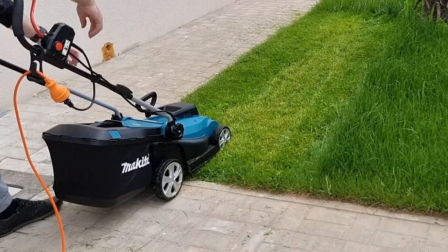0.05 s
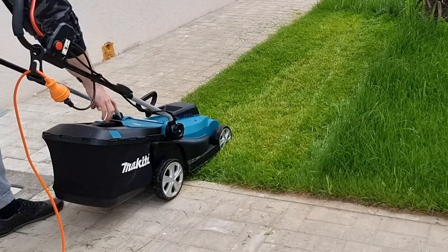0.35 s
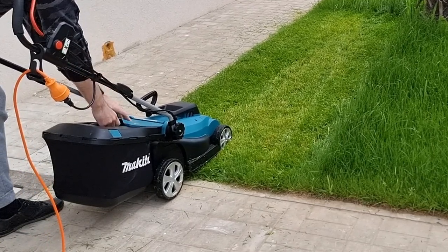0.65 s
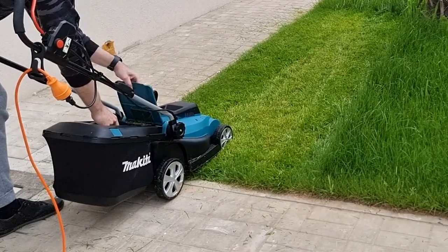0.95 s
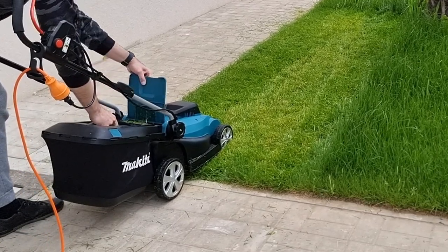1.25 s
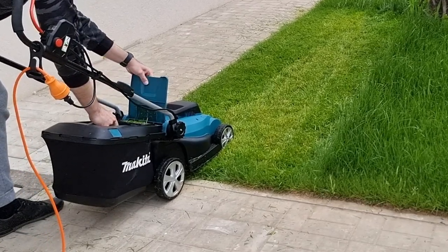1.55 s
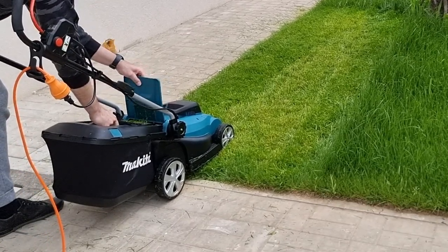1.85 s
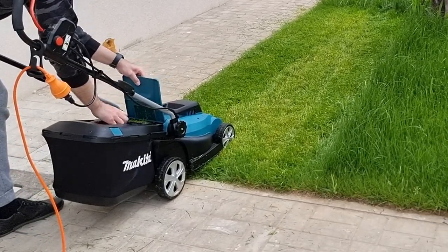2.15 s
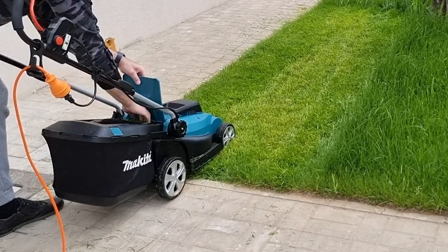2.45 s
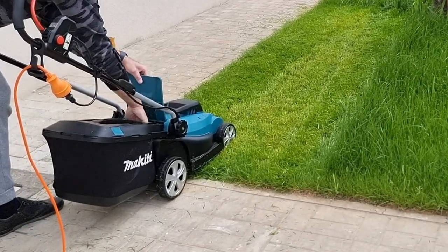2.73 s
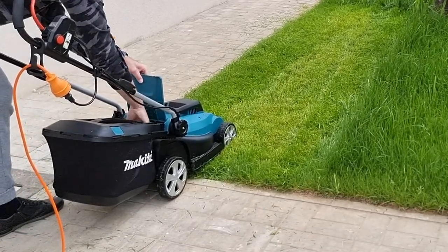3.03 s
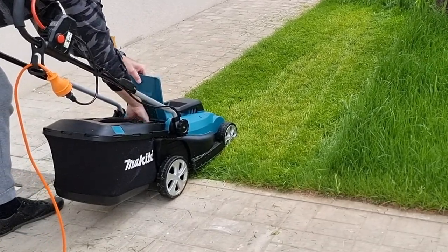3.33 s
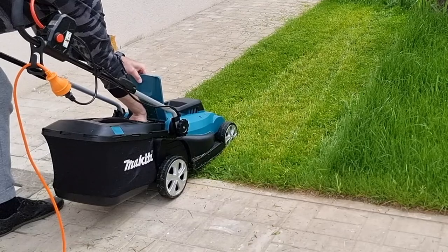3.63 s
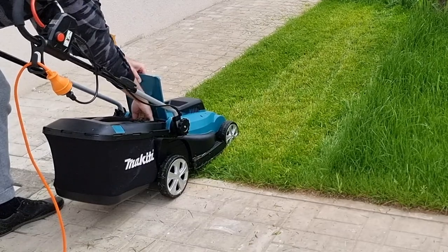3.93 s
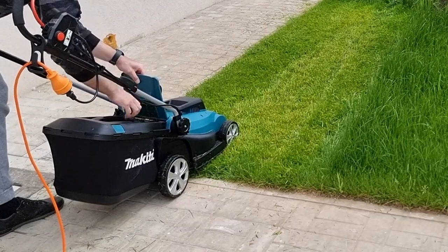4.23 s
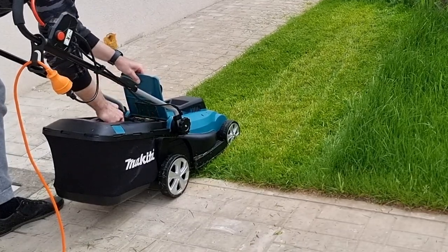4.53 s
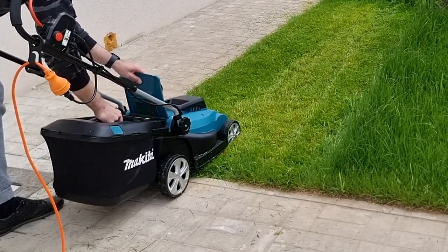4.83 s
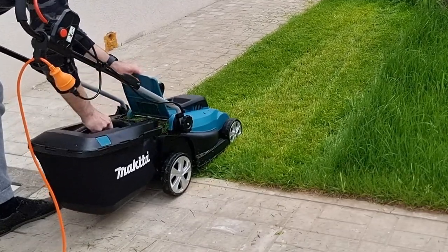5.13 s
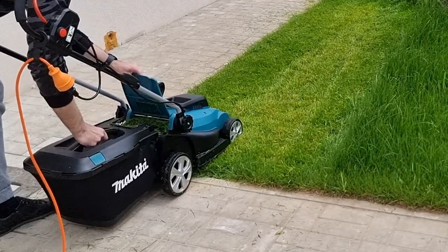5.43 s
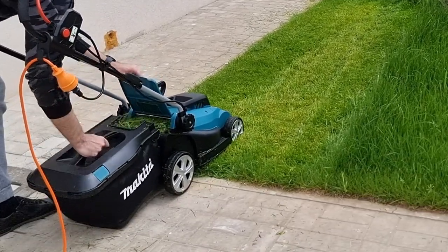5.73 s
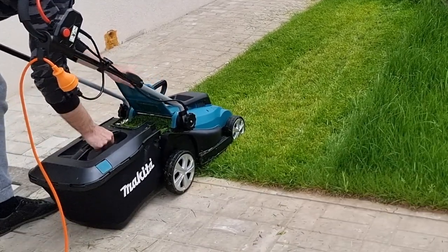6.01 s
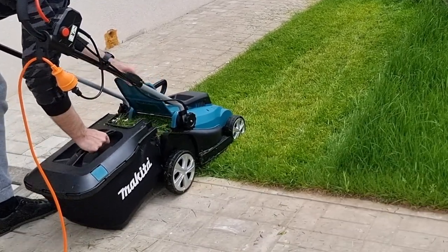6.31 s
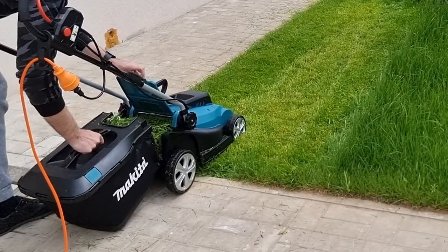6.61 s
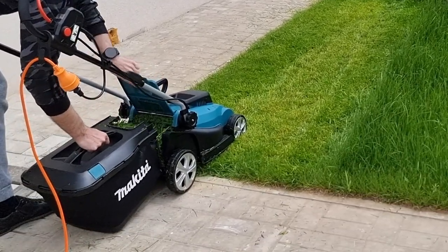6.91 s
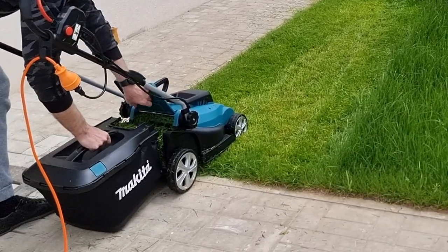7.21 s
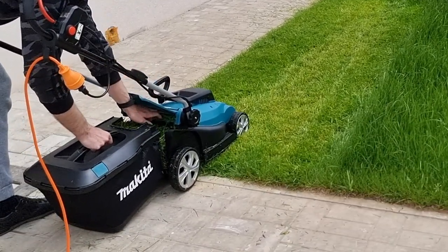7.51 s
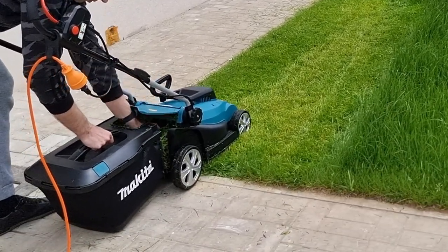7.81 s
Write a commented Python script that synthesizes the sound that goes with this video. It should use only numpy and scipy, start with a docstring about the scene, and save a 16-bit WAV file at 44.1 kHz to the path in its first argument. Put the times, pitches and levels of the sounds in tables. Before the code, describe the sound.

The plastic grass catcher of a switched-off lawn mower is handled close to the microphone in a yard. Light clicks, rustles and finger taps come first. A little past halfway it unhooks with one loud, sharp clack, followed by smaller knocks, scraping and a hollow thud on paving. Near the end the flap shuts with a faint groan, a scrape and crisp clicks. Small birds chirp further off throughout, over a faint town drone.

```python
"""Removing a mower's grass catcher

The plastic catcher of a switched-off lawn mower is unhooked, lifted out and set down on paving.
Impacts excite the modes of the hollow box, which clacks and thuds; stick-slip friction makes it
scrape, a hand rustle in the chute and the flap groan shut. House walls reflect the sound.
Small birds chirp further off, over the low drone of a town."""
import sys
import numpy as np
from scipy import signal
from scipy.fft import rfft, irfft, next_fast_len
from scipy.io import wavfile

SR = 44100
rng = np.random.default_rng(int(sys.argv[2]) if len(sys.argv) > 2 else 0)


def unload_wav(signal):
    """Save mono or channel-first audio to the path in sys.argv[1] as 16-bit WAV at rate SR, clipped to [-1, 1]."""
    wavfile.write(
        sys.argv[1],
        SR,
        np.round(np.clip(np.atleast_2d(signal).T, -1, 1) * 32767).astype(np.int16),
    )


N = 355446
TIME = np.arange(N) / SR

# impacts of the box on mower and paving, the row at 4.858 s being the main knock returned by a house wall:
# (time [s], level [dB], then relative to it: flat landing [dB], hollow body [dB], bright rim [dB], crisp edge
# [dB]; then boom frequency [Hz], boom level [dB])
KNOCKS = [(0.286, -43.5, -1, -1, 12.5, 12, 475, -38.5), (4.8146, -15.5, 4.5, -10.5, -2, -15, 1470, -15.5),
          (4.8349, -40.5, 7.5, 4.5, -2, 10, 690, -34), (4.8583, -43.5, 5, -4, 9, -20, 2720, -28),
          (5.0659, -38.5, 4.5, 1, 0.5, -11, 785, -33), (5.0749, -37.5, 1, -3, -1, -6, 1350, -33),
          (5.094, -42, 3, 3.5, 3, -3, 228, -38), (5.294, -36.5, -4.5, -27, 7, 7, 1610, -34.5),
          (5.664, -57, -9, 14, 14, 17, 316, -40.5), (5.8647, -31, -5, 6.5, -7.5, 8, 500, -37),
          (5.955, -42.5, 0.5, 12.5, -6, 1, 287, -33)]
# likeness of left and right in the yard: (frequency [Hz], correlation [-])
CORRELATION = [(60, 0.88), (190, 0.93), (290, 0.17), (420, -0.24), (700, -0.62), (1300, -0.53),
               (2400, -0.16), (15000, -0.043)]


def from_db(db):
    """Amplitude ratio of a level in decibels."""
    return 10 ** (np.asarray(db) / 20)


def unit_rms(x):
    """Normalisation to unit mean power."""
    return x / np.sqrt(np.mean(x ** 2) + 1e-20)


def at_hz(points, hz):
    """Interpolation of a spectrum on a logarithmic frequency axis."""
    points = np.array(points)
    return np.interp(np.log(hz), np.log(points[:, 0]), points[:, 1])


def decay(t, t60):
    """Exponential damping by 60 dB in t60 seconds."""
    return np.exp(-np.log(1000) * t / t60)


def add(out, onset, sound):
    """Superposition of a sound on the mix, from its onset in seconds."""
    start = max(round(onset * SR), 0)
    out[..., start:start + sound.shape[-1]] += sound[..., :N - start]


def butterworth(x, order, hz, kind):
    """Filtering with a maximally flat passband."""
    return signal.sosfilt(signal.butter(order, hz, kind, fs=SR, output="sos"), x)


def noise(spectrum, size):
    """Random-phase stereo noise of a given spectrum, partly correlated between the sides; rms 1."""
    hz = np.maximum(np.fft.rfftfreq(size, 1 / SR), 1)
    correlation = np.clip(at_hz(CORRELATION, hz), -1, 1)
    mid, side = np.exp(2j * np.pi * rng.random((2, len(hz))))
    stereo = np.sqrt(1 + correlation) * mid + np.sqrt(1 - correlation) * side * [[1], [-1]]
    return unit_rms(irfft(stereo * from_db(at_hz(spectrum, hz)), size))


def narrow_noise(hz, half_width_hz):
    """Noise through one resonance, which at 0 Hz gives a random drift; rms 1."""
    size = next_fast_len(N)
    detuning = (np.fft.rfftfreq(size, 1 / SR) - hz) / half_width_hz
    return unit_rms(irfft(rfft(rng.standard_normal(size)) / (1 + detuning ** 2), size)[:N])


def town():
    """Incoherent far sources sum to a wash of traffic, a swelling rumble and narrow-band drones."""
    # traffic and rumble: (frequency [Hz], relative spectral density [dB])
    traffic_spectrum = [(20, -9), (54, -4), (168, -8), (215, -9), (330, -11.5), (780, -13.5), (1100, -19.5),
                        (1900, -27), (2600, -28.5), (3900, -27), (4800, -41), (6900, -36), (8400, -58.5),
                        (11000, -53.5), (15500, -52.5)]
    rumble_spectrum = [(20, -14), (33, -5.5), (52, 14), (75, 4.5), (110, -9.5), (200, -37), (600, -94)]
    # swell of the rumble: (time [s], level [dB])
    swell = [(0, -61.5), (1.2, -54), (1.7, -57.5), (2.3, -51.5), (3.9, -59), (4.3, -63.5), (5.2, -61),
             (6.3, -56), (8.06, -61)]
    # far machinery: (frequency [Hz], bandwidth [Hz], level [dB])
    machines = [(52.7, 11, -65.5), (137.7, 3.1, -65), (223.7, 9.5, -65.5)]
    rumble = from_db(np.interp(TIME, *np.transpose(swell))) * noise(rumble_spectrum, N)
    drones = sum(from_db(db) * narrow_noise(hz, width / 2) for hz, width, db in machines)
    return from_db(-56) * noise(traffic_spectrum, N) + rumble + drones


def whine(waver_hz):
    """A faint tone sinks and fades; random amplitude modulation spreads it into a narrow band."""
    # falling tone: (time [s], frequency [Hz], level [dB])
    glide = [(0, 750, -63), (0.199, 677, -68), (0.451, 595, -74), (.8, 532, -88)]
    times, hz, db = np.transpose(glide)
    phase = 2 * np.pi * np.cumsum(np.interp(TIME, times, hz)) / SR
    waver = np.array([narrow_noise(0, waver_hz) for side in range(2)])
    return from_db(np.interp(TIME, times, db)) * np.sin(phase) * waver


def chorus(flicker_db, bands=6):
    """Many far birds superpose into a noisy twitter whose bands fluctuate independently."""
    # swell of the twitter: (time [s], level [dB])
    swell = [(0, -65.5), (1.0, -74), (2.1, -76), (2.95, -61), (4.0, -72.5), (4.5, -65.5), (5.6, -72),
             (8.06, -68)]
    # its colour: (frequency [Hz], relative spectral density [dB])
    colour = [(1800, -18), (2800, -5), (3900, 2.5), (4700, -4.5), (5400, -8), (6800, -13), (8200, -30),
              (11000, -37)]
    spectrum = rfft(noise(colour, N))
    band = np.digitize(np.fft.rfftfreq(N, 1 / SR), np.geomspace(3100, 5000, bands - 1))
    twitter = sum(irfft(spectrum * (band == k), N) * from_db(flicker_db * narrow_noise(0, 12))
                  for k in range(bands))
    return from_db(np.interp(TIME, *np.transpose(swell))) * twitter


def bird_notes():
    """Birds repeat stereotyped calls, each time transposed by a common frequency ratio."""
    # notes of a call: (delay [s], duration [s], start pitch [Hz], middle pitch [Hz], end pitch [Hz],
    # relative level [dB], rasp [share of pitch])
    rising_call = [(0, 0.0426, 4810, 5204, 5290, 1.5, 0.046), (.085, .045, 3493, 4230, 4300, -2, 0.064)]
    swoop_call = [(0, .03, 5450, 5520, 5300, -5, 0.012), (.014, .05, 5200, 4870, 4000, 0, 0.016),
                  (.095, 0.045, 3620, 3680, 3660, -7, 0.02), (.108, .028, 3950, 4100, 4080, -7, .03)]
    chirrup_call = [(0, 0.03, 3900, 4160, 4370, 0, 0.027), (.022, .1, 3750, 3150, 2850, -8.5, 0.065)]
    slur_call = [(0, 0.06, 3950, 4260, 4030, -4.5, 0.055), (.045, 0.095, 3300, 2950, 2750, -2.5, 0.06)]
    pip_call = [(0, 0.024, 3900, 4020, 3850, 0, 0.05)]
    # when each is sung: (time [s], level [dB], pitch ratio [-])
    risings = [(0.022, -62, 1.05), (0.318, -61.5, 1.04), (0.754, -62, 1.01), (1.603, -63.5, 0.99),
               (2.094, -62, 0.99), (3.359, -61, 1.03), (3.707, -63, .98), (4.149, -61.5, 1.04),
               (6.415, -62, 1), (7.815, -63, 1.01)]
    swoops = [(1.274, -46.5, 1), (2.943, -48.5, 1.01), (5.116, -53.5, 1.01)]
    chirrups = [(0.874, -49.5, 0.97), (2.37, -51.5, 1)]
    slurs = [(0.567, -71.5, 1), (1.035, -61.5, 0.97), (1.48, -59, 1.15), (2.834, -60, 0.96),
             (4.389, -60, 0.96), (5.402, -62, 1.03), (6.312, -57.5, 1.01), (6.813, -59, 0.98),
             (7.645, -59.5, 1.03)]
    pips = [(0.488, -60, 0.99), (0.599, -60, 1), (0.683, -67, 0.97), (1.626, -58, 0.99),
            (1.702, -55.5, 0.99), (1.790, -58.5, 1), (1.868, -56, 1), (4.11, -66, 0.95), (4.508, -63.5, 1),
            (4.648, -62, .98), (4.72, -61, 0.97), (6.147, -60, 0.95)]
    for call, repeats in ((rising_call, risings), (swoop_call, swoops), (chirrup_call, chirrups),
                          (slur_call, slurs), (pip_call, pips)):
        for onset, db, ratio in repeats:
            for delay, length, *pitches, note_db, rasp in call:
                yield onset + delay, length, ratio * np.array(pitches), db + note_db, rasp


def birds(waver_hz, flutter_db, overtone_db):
    """Each note is a whistle gliding through three pitches, made raspy by fast frequency modulation."""
    song, waver = np.zeros(N), narrow_noise(0, waver_hz)
    for onset, length, pitches, db, rasp in bird_notes():
        progress = np.linspace(0, 1, round(length * SR))
        glide = np.polyval(np.polyfit([0, .5, 1], pitches, 2), progress)
        pitch = glide * (1 + rasp * np.interp(onset + length * progress, TIME, waver))
        phase = 2 * np.pi * np.cumsum(pitch) / SR
        whistle = np.sin(phase) + from_db(overtone_db) * np.sin(2 * phase)
        add(song, onset, from_db(db) * whistle * np.sqrt(np.abs(np.sin(np.pi * progress))))
    song *= from_db(flutter_db * narrow_noise(0, 51))
    return np.array([song, np.interp(TIME - .00048, TIME, song)])   # reaches the left side first


def yard_reverb(x, t60, wet_db, dull_hz):
    """Diffuse scattering from paving, walls and fences leaves a decaying tail with weakened treble."""
    t = TIME[:SR]
    tail = noise([(20, 0), (dull_hz, 0), (4 * dull_hz, -12)], SR) * decay(t, t60)
    tail *= 1 - decay(t, 0.0055)
    tail /= np.sqrt(np.sum(tail ** 2) / 2)   # unit mean energy per side
    return from_db(wet_db) * signal.fftconvolve(x, tail, axes=1)[:, :N]


def wall_echoes(x, low_hz, high_hz):
    """Specular reflection: each house wall returns one band-limited copy, slightly later on the right."""
    # reflections: (delay [s], level [dB])
    walls = [(0.021, -10), (0.044, -12)]
    out, reflected = np.zeros((2, N)), butterworth(x, 1, [low_hz, high_hz], "band")
    for delay, db in walls:
        add(out[0], delay, from_db(db) * reflected[0])
        add(out[1], delay + 0.0001, from_db(db) * reflected[1])
    return out


def flap_squeak():
    """Periodic stick-slip in the lowered flap gives an arching pitch; only a few high harmonics carry."""
    # the squeak: (time [s], duration [s], peak fundamental [Hz], sag at the ends [share of pitch])
    stroke = (7.076, .082, 570, .09)
    # its partials: (harmonic number [-], level [dB])
    harmonics = [(5, -57), (6, -54), (7, -85), (9, -77)]
    onset, length, peak_hz, sag = stroke
    from_middle = np.clip(2 * (TIME - onset) / length - 1, -1, 1)
    phase = 2 * np.pi * np.cumsum(peak_hz * (1 - sag * from_middle ** 2)) / SR
    tone = (1 - from_middle ** 2) * sum(from_db(db) * np.sin(k * phase) for k, db in harmonics)
    return np.array([tone, np.interp(TIME - .0005, TIME, tone)])   # reaches the left side first


def flap_groans(slips_per_s, t60):
    """Irregular stick-slip: each slip of the swinging flap excites a resonance of the hollow plastic."""
    # drags as it opens and shuts: (time [s], duration [s], resonance [Hz], level [dB])
    drags = [(0.96, 0.17, 550, -64), (1.027, 0.068, 337, -61.5), (7.227, 0.053, 205, -55.5),
             (7.28, 0.099, 312, -59), (7.346, 0.09, 265, -55.5), (7.471, 0.075, 257, -60),
             (7.612, 0.044, 304, -56)]
    out = np.zeros(N)
    for onset, length, hz, db in drags:
        t = TIME[:round(length * SR)]
        slips = (rng.random(SR)[:len(t)] < slips_per_s / SR) | (t == 0)
        resonance = np.sin(2 * np.pi * hz * t) * decay(t, t60)
        ringing = signal.fftconvolve(slips.astype(float), resonance)[:len(t)]
        envelope = np.sqrt(np.abs(np.sin(np.pi * t / length)))
        add(out, onset, from_db(db) * unit_rms((ringing - ringing.mean()) * envelope))
    return out


def grit(grains_per_s, spread_db, low_hz):
    """Shot noise: dry clippings and sand crunch under the sliding plastic in tiny random clicks."""
    # gritty scrapes: (time [s], duration [s], level [dB])
    scrapes = [(0.17, 0.059, -68), (0.273, 0.054, -62.5), (5.827, 0.27, -72), (7.342, 0.12, -73)]
    out = np.zeros((2, N))
    for onset, length, db in scrapes:
        size = round(length * SR)
        hits = rng.random((2, size)) < grains_per_s / SR
        clicks = hits * rng.standard_normal((2, size)) * from_db(spread_db * rng.standard_normal(size))
        crunch = unit_rms(butterworth(clicks, 2, low_hz, "high"))
        add(out, onset, from_db(db) * crunch * np.sin(np.pi * np.linspace(0, 1, size)))
    return out


def rubs(grain_db, judder_db, skid_s):
    """Sliding friction sticks and slips, radiating a grainy hiss and driving a shudder in the box."""
    # sleeve, clippings and plastic sliding: (time [s], duration [s], hiss [dB], shudder [dB])
    slides = [(0.0, 0.6, -72, -64.5), (0.15, 0.1, -64.5, -68), (0.296, 0.052, -67, -57),
              (0.595, 0.25, -70, -61.5), (0.921, 0.46, -96, -60.5), (2.572, 0.61, -71.5, -62),
              (4.792, 0.071, -62, -45.5), (4.927, 0.64, -62, -54), (5.692, 0.75, -63, -60),
              (5.89, 0.065, -61, -54), (6.617, 0.37, -65.5, -63.5), (7.206, 0.29, -73, -58),
              (7.344, 0.1, -51.5, -63), (7.444, 0.38, -58, -58.5)]
    # friction noise: (frequency [Hz], relative spectral density [dB])
    hiss_spectrum = [(800, 7.5), (2000, -13.5), (4000, 8), (6200, 5), (8000, -6.5), (10000, -11.5),
                     (15000, -18)]
    shudder_spectrum = [(110, -39), (200, 2), (300, -4.5), (500, -3), (800, -8), (1300, -11), (2500, -18),
                        (6000, -46)]
    # the heavier a knock thuds, the louder the box skids after it
    skids = [(onset, skid_s, db + hollow_db - 33.5, db + hollow_db - 20)
             for onset, db, _, hollow_db, *_ in KNOCKS]
    hiss, shudder = np.zeros((2, N))
    for onset, length, hiss_db, shudder_db in slides + skids:
        stroke = np.sin(np.pi * np.clip((TIME - onset) / length, 0, 1) ** 0.36)   # peaks early
        hiss += from_db(hiss_db) * stroke
        shudder += from_db(shudder_db) * stroke
    grains = unit_rms(from_db(grain_db * narrow_noise(0, 350)))
    judder = unit_rms(from_db(judder_db * narrow_noise(0, 42)))
    return judder * (hiss * grains * noise(hiss_spectrum, N) + shudder * noise(shudder_spectrum, N))


def ticks(t60, size=2048):
    """Sudden release of small stiff catches radiates bright, heavily damped transients."""
    # hooks and flap edge letting go: (time [s], level [dB])
    releases = [(0.025, -52), (0.18, -45.5), (0.283, -57), (2.554, -47), (4.150, -47.5), (5.181, -48),
                (5.865, -60), (5.989, -47.5), (6.172, -59), (7.349, -45), (7.355, -42), (7.379, -43),
                (7.638, -38.5)]
    # quick steps in which a catch slips: (delay [s], relative level [dB])
    steps = [(0, -1), (.0035, -10), (.0074, -10)]
    # colour of a tick: (frequency [Hz], relative spectral density [dB])
    spectrum = [(1000, -11), (3500, -12), (5500, 0), (7000, 4.5), (9000, -14.5), (15000, -15)]
    out = np.zeros((2, N))
    for onset, db in releases:
        for delay, step_db in steps:
            add(out, onset + delay, from_db(db + step_db) * noise(spectrum, size) * decay(TIME[:size], t60))
    return out


def booms(attack_cycles, decay_cycles):
    """Flexural vibration: the struck wall booms at a pitch set by the spot and the grip."""
    out, t = np.zeros((2, N)), TIME[:SR // 2]
    for onset, *_, hz, db in KNOCKS:
        phase_gap = np.arccos(np.clip(at_hz(CORRELATION, hz), -1, 1))   # the left side leads
        tone = np.sin(2 * np.pi * hz * t + phase_gap * np.array([[.5], [-.5]]))
        envelope = decay(t, decay_cycles / hz) * (1 - decay(t, attack_cycles / hz))
        add(out, onset, from_db(db) * tone * envelope)
    return out


def contacts(landing_s=.0037):
    """A knock is a multiple impact of edge, flat wall and rebound; a finger tap is a single one."""
    # normal modes: (frequency [Hz], level [dB], t60 [s], left-right correlation before clipping [-])
    box_modes = [(145, -26, 0.35, 0.47), (191.6, -27.5, 0.36, 1), (226, -21.5, 0.15, 0.75),
                 (322, -14, 0.044, 0.25), (393, -15.5, 0.11, -0.46), (481, -14, 0.053, -0.15),
                 (510, -20.5, 0.18, -0.92), (626, -18, 0.05, -1.13), (785, -22.5, 0.074, -0.91),
                 (810, -16.5, 0.094, -0.81), (1060, -20.5, 0.04, -1.1), (1286, -19, 0.044, -0.58),
                 (1617, -15, 0.025, -0.12), (1730, -16, 0.032, 1), (1855, -16, 0.025, 0.58),
                 (1930, -25.5, 0.17, -0.83), (2036, -18, 0.17, 0.04), (2093, -24.5, 0.1, -0.95),
                 (2240, -13, 0.031, -0.7), (2634, -18, 0.029, -1), (3140, -16, 0.064, -1.94),
                 (3356, -22, 0.036, 0.2), (4300, -12.5, 0.0021, 1), (6700, -22, 0.02, 0)]
    flap_modes = [(146.5, -7, 0.12, 0.59), (190, -16, 0.13, 0.8), (345, -11, 0.061, 0.14),
                  (690, 0.5, 0.082, -0.96), (780, -8.5, 0.045, -0.28), (1130, -6, 0.027, -0.42),
                  (1470, -2, 0.024, -0.003), (1860, -1, 0.028, -0.46), (3940, -13.5, 0.023, 0.26),
                  (5650, -8, 0.011, 0.78)]
    # impacts of the lowered flap: (time [s], level [dB], then relative to it: flat landing [dB],
    # hollow body [dB], bright rim [dB], crisp edge [dB])
    flap_knocks = [(7.266, -39, -4.5, 6.5, -2.5, 11), (7.542, -55, 9, 8, 26.5, -2)]
    # the loose plastic bouncing once: (delay [s], relative level [dB])
    rebound = (0.011, -12)
    # fingers on the wall: (time [s], level [dB])
    taps = [(2.288, -46.5), (3.247, -46.5), (3.761, -46), (6.807, -45)]
    # tint of a tap, and of a flat landing against the first touch: (frequency [Hz], gain [dB])
    tap_colour = [(380, 2), (1700, -2.5), (4500, -2), (10000, -8)]
    landing_tint = [(380, 6.5), (1700, -0.5), (4500, -0.5), (10000, -8)]
    rebound_s, rebound_db = rebound
    for modes, blows in ((box_modes, KNOCKS), (flap_modes, flap_knocks)):
        for onset, db, landing_db, hollow_db, bright_db, crisp_db, *_ in blows:
            colour = [(380, hollow_db), (1700, 0), (4500, bright_db), (10000, crisp_db)]
            landing_colour = [(hz, gain_db + at_hz(landing_tint, hz)) for hz, gain_db in colour]
            yield modes, onset, db, colour
            yield modes, onset + landing_s, db + landing_db, landing_colour
            yield modes, onset + rebound_s, db + rebound_db, colour
    for onset, db in taps:
        yield box_modes, onset, db, tap_colour


def impact(modes, colour, snap_hz, spread_db, size=8192):
    """Impulse response: a snap and a short crack, while the modes ring as strongly as the spot allows."""
    # crowded, quickly damped modes of the thin walls: (frequency [Hz], relative spectral density [dB])
    crack_spectrum = [(150, -60), (450, 10), (850, 14), (1150, -9), (1700, -0.5), (3300, 2.5), (4800, -7.5),
                      (6500, -5.5), (9000, -21), (15000, -51)]
    t = TIME[:size]
    hz, db, t60, correlation = np.transpose(modes)[:, :, None]
    index = np.arange(len(modes))[:, None]
    strength = from_db(db + at_hz(colour, hz) + spread_db * rng.standard_normal(hz.shape))
    # each wall radiates its own way, so a mode reaches one side first
    lag = np.arccos(np.clip(correlation, -1, 1)) / (2 * np.pi * hz) * (-1) ** (index // 2)
    age = np.maximum(t - np.maximum([lag, -lag], 0), 0)
    ringing = np.sum((-1) ** index * strength * np.sin(2 * np.pi * hz * age) * decay(age, t60), axis=1)
    snap = from_db(22) * butterworth(t == 0, 2, [snap_hz / np.sqrt(2), snap_hz * np.sqrt(2)], "band")
    crack = from_db(-5.5) * noise(crack_spectrum, size) * (1 - decay(t, 0.0033))
    tint = from_db(at_hz(colour, np.maximum(np.fft.rfftfreq(size, 1 / SR), 1)))
    return ringing + irfft(rfft(snap + crack) * tint) * decay(t, t60=0.043)


def knocks(hard_snap_hz, thud_db_per_octave, lowest_hz):
    """Impacts clack and thud: softer contacts snap lower, and the box is too small to radiate deep bass."""
    out = np.zeros((2, N))
    for modes, onset, db, colour in contacts():
        (_, hollow_db), (_, middle_db), *_ = colour
        snap_hz = hard_snap_hz / 2 ** (max(hollow_db - middle_db, 0) / thud_db_per_octave)
        add(out, onset, from_db(db) * impact(modes, colour, snap_hz, spread_db=2.0))
    return butterworth(out, 2, lowest_hz, "high")


def scene():
    """Direct and reflected sound superpose: the box close by, the birds more reverberant, the town behind."""
    box = knocks(hard_snap_hz=1750, thud_db_per_octave=5.5, lowest_hz=168) + ticks(t60=0.01)
    box += booms(attack_cycles=1.8, decay_cycles=40)
    box += flap_groans(slips_per_s=130, t60=0.06)
    box += grit(grains_per_s=3500, spread_db=2.0, low_hz=7900)
    box += rubs(grain_db=1.5, judder_db=3.0, skid_s=0.1)
    echoes = wall_echoes(box, low_hz=2230, high_hz=4900)
    box += echoes + yard_reverb(box, t60=0.35, wet_db=-15.0, dull_hz=4330)
    song = birds(waver_hz=450, flutter_db=2.5, overtone_db=-39)
    song = from_db(0.5) * song + yard_reverb(song, t60=0.46, wet_db=-3.0, dull_hz=5900)
    background = song + chorus(flicker_db=4.0) + town()
    balance = from_db([[-.6], [.6]])   # the right side is slightly louder
    return (box + flap_squeak() + whine(waver_hz=41) + background) * balance


def record(dry):
    """An elliptic low-pass filter cuts the top steeply at 15.6 kHz."""
    return signal.sosfilt(signal.ellip(10, .1, 80, 15600, fs=SR, output="sos"), dry)


dry = scene()
out = record(dry)
unload_wav(out)
```